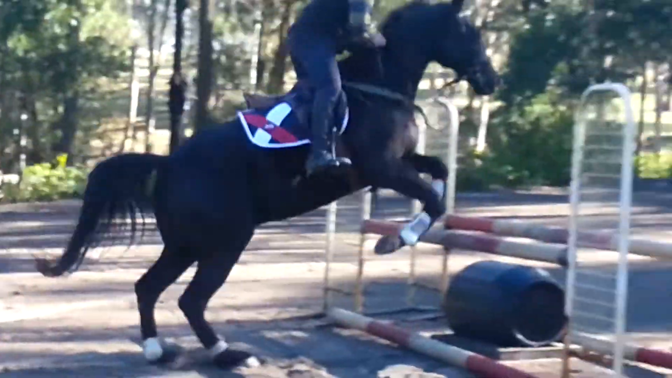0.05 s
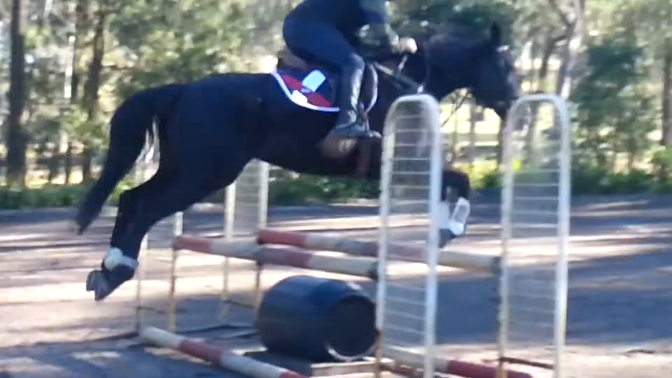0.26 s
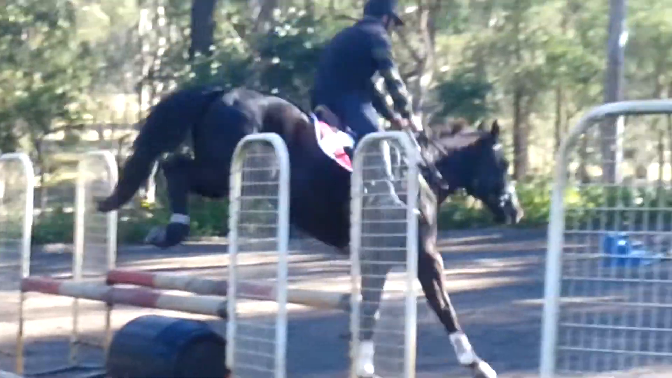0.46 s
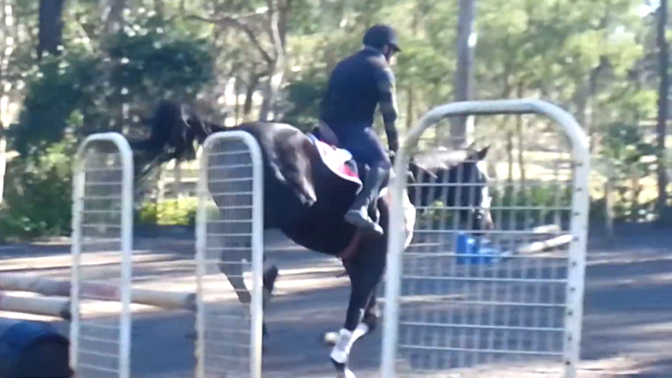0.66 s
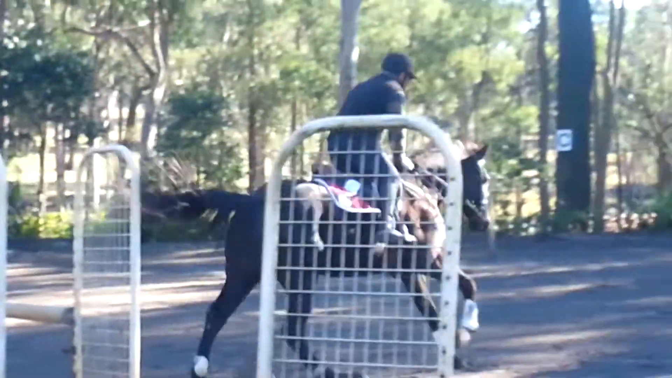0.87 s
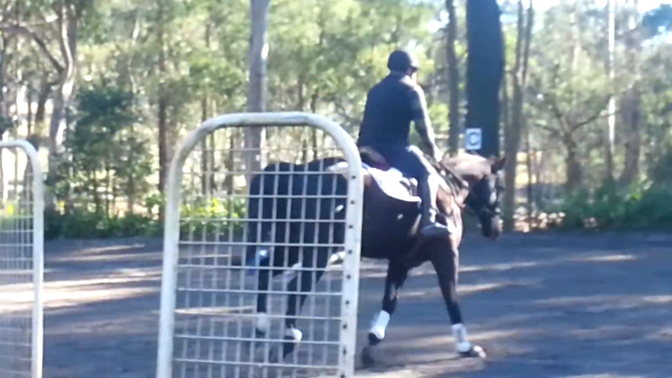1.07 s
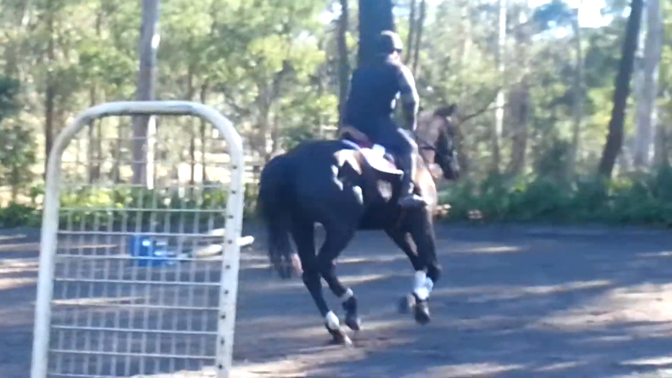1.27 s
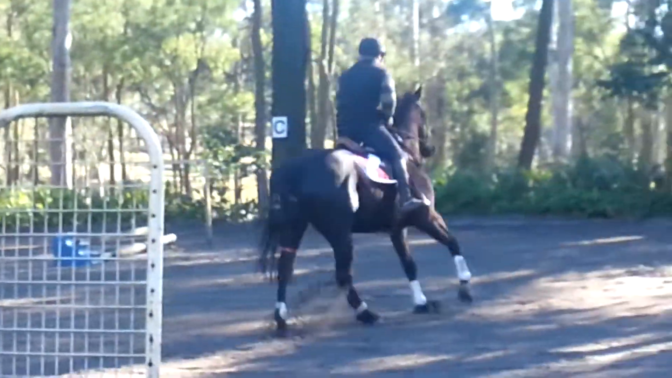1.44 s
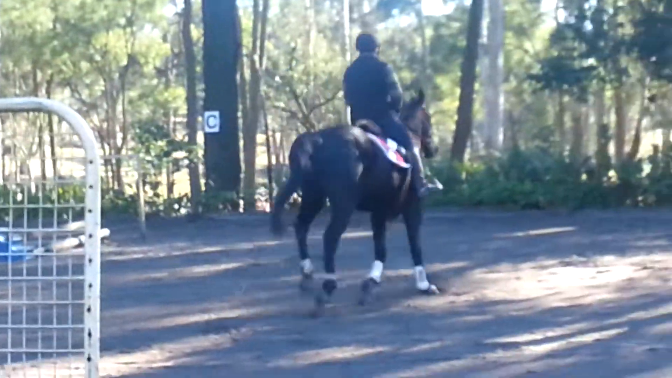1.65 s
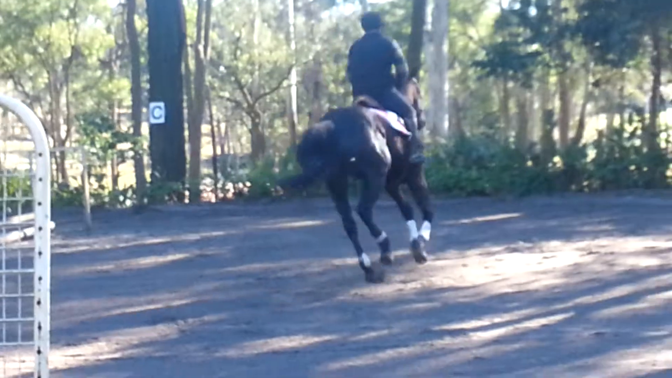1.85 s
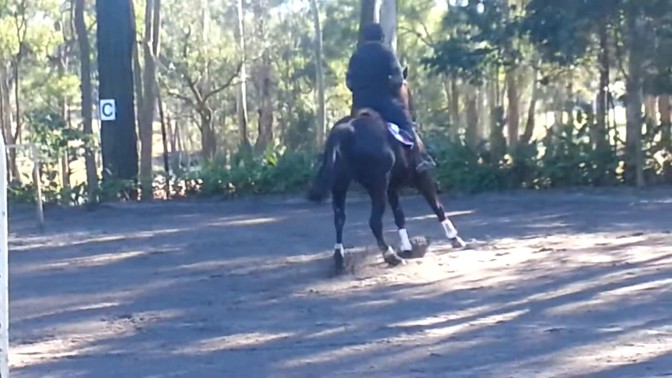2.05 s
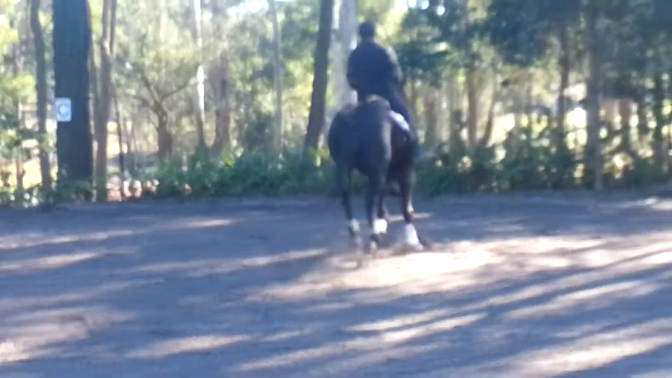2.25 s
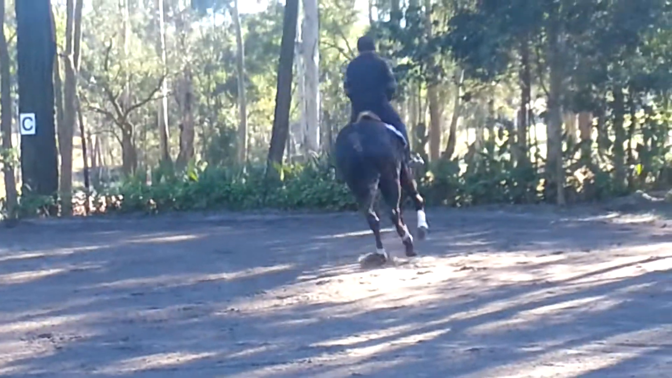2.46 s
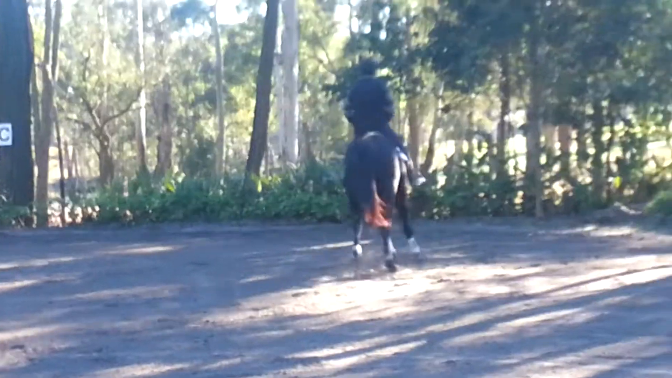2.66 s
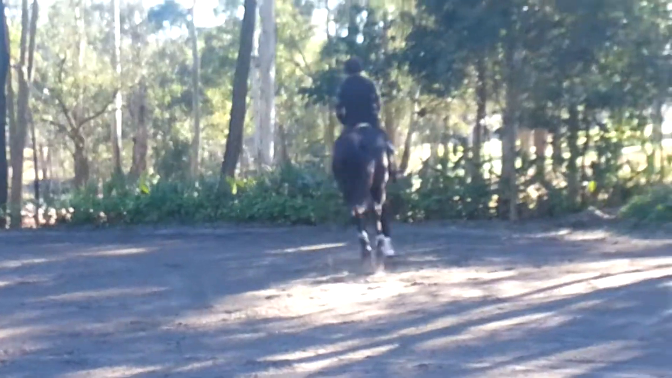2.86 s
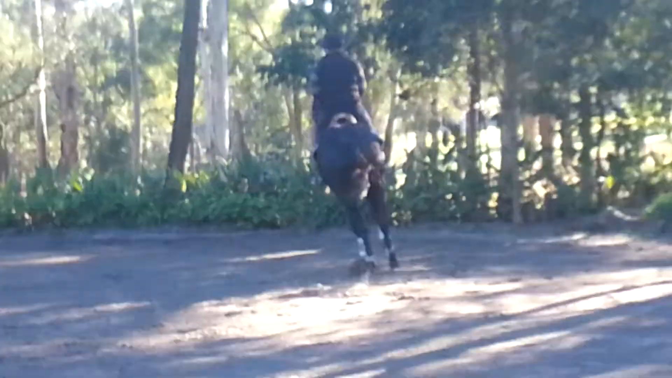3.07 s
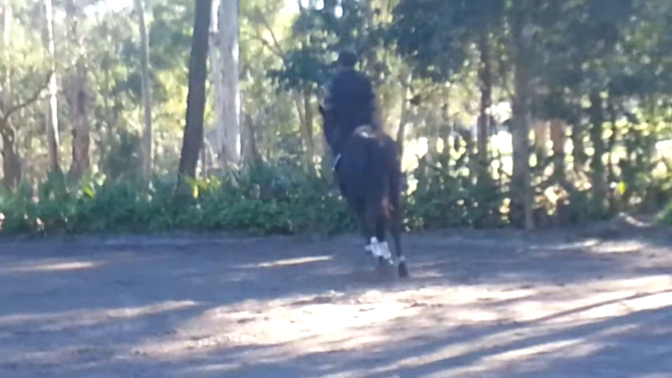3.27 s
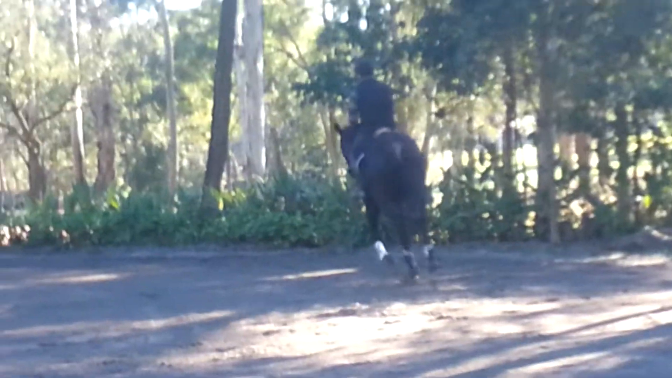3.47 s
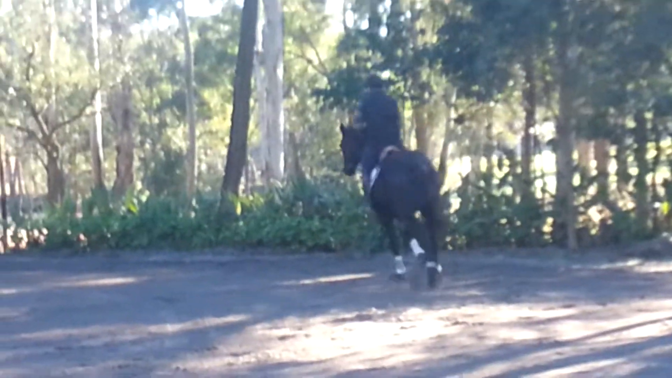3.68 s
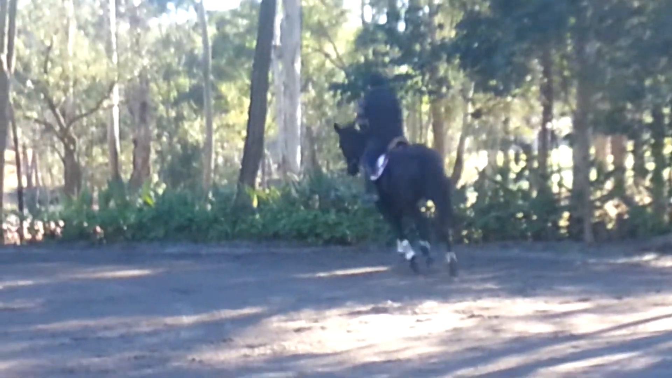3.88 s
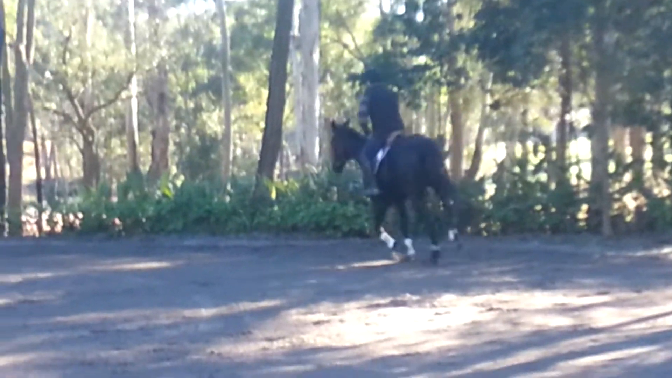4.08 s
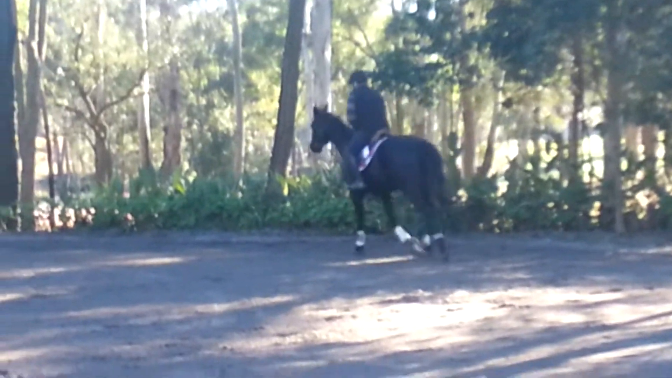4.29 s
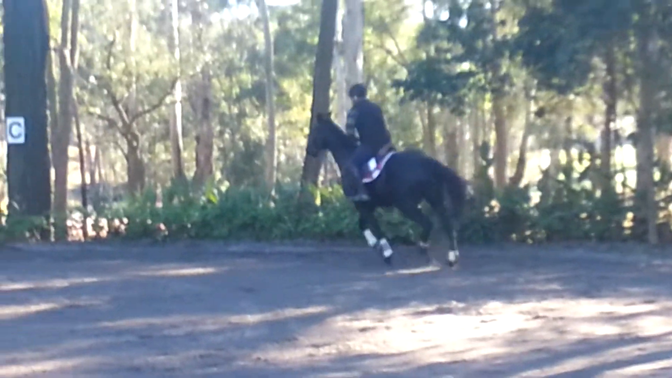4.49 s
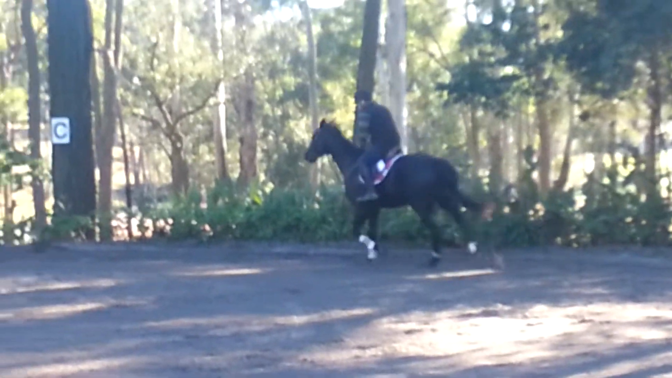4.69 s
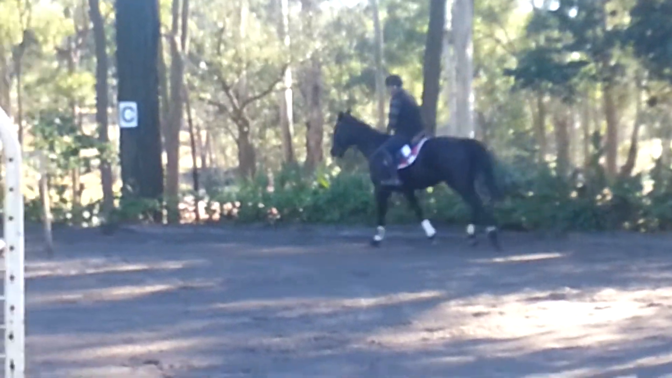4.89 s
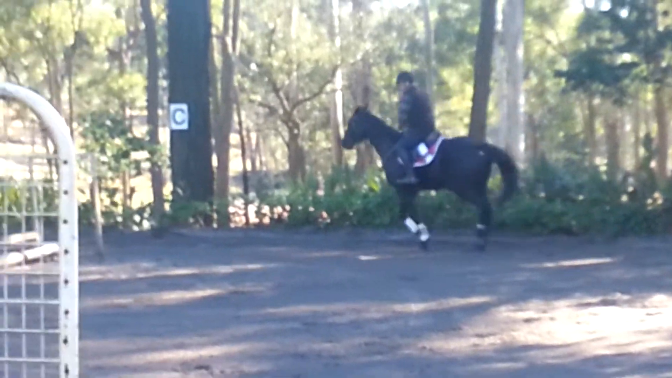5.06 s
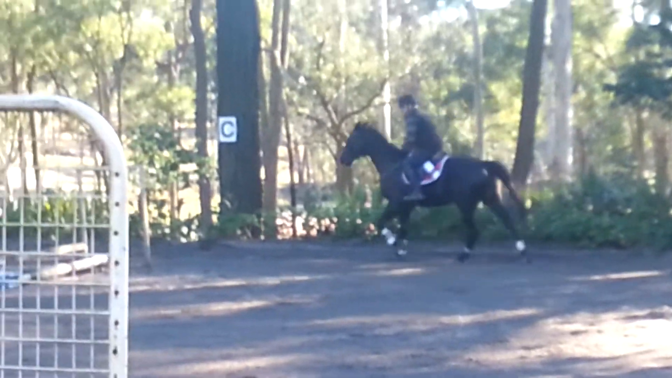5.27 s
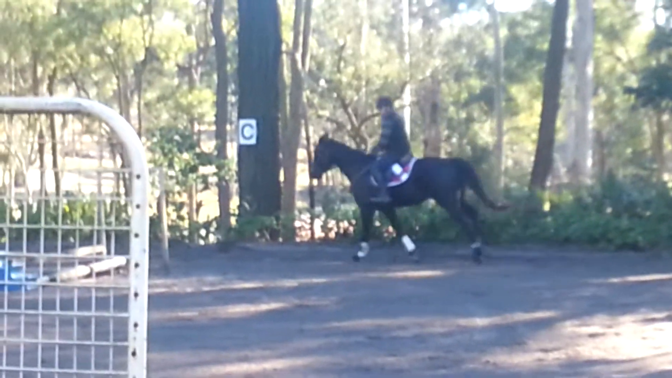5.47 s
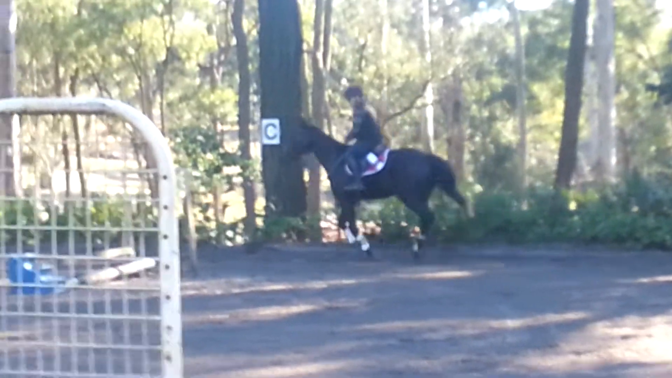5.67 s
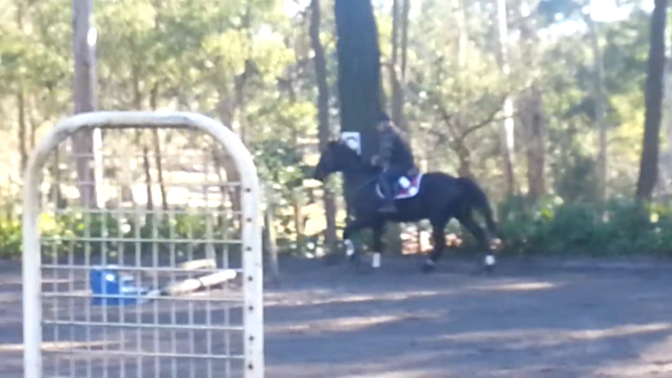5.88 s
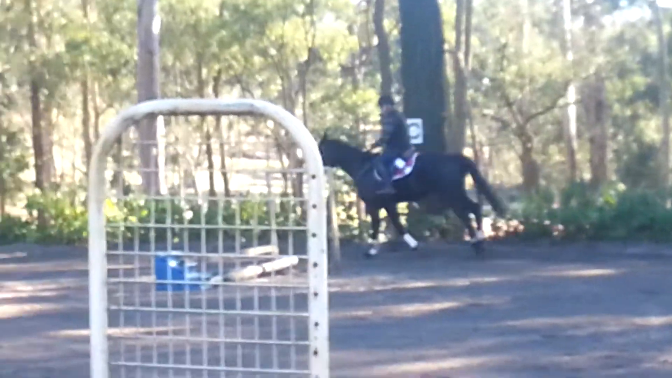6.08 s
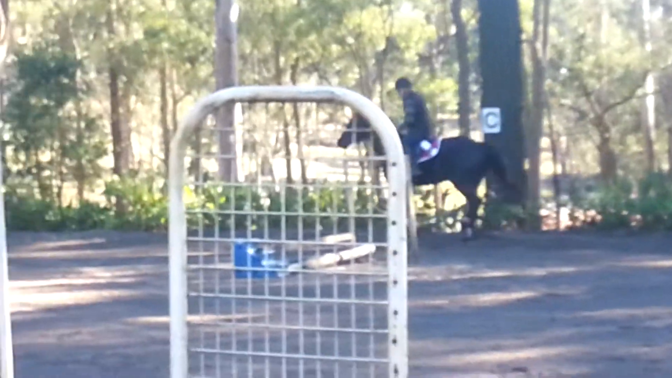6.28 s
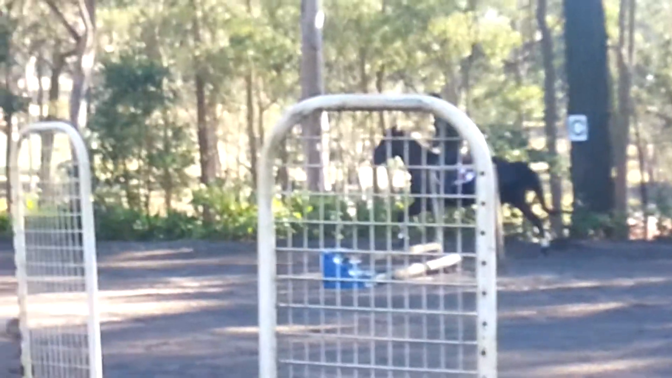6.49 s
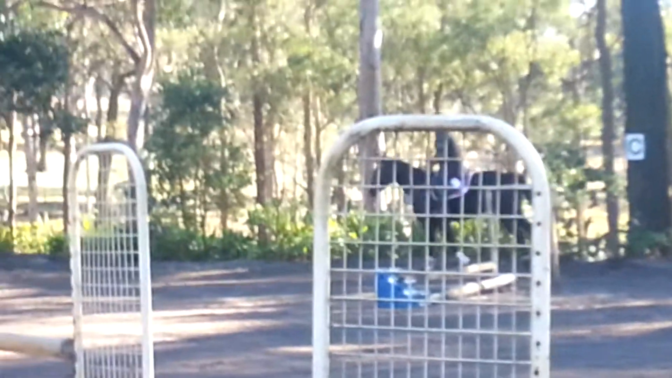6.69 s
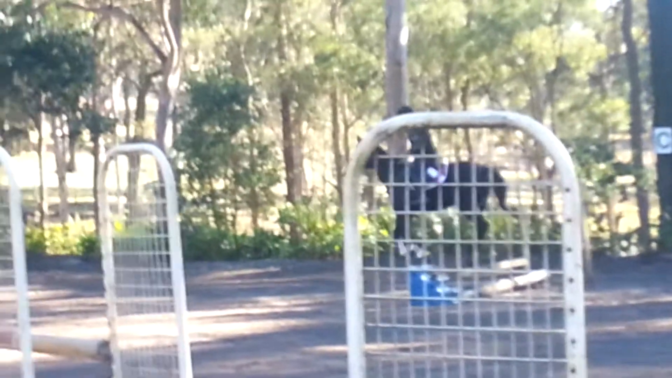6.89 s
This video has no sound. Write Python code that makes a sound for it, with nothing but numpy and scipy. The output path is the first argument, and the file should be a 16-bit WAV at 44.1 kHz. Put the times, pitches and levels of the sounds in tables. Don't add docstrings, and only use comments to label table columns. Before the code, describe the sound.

Outdoors in a wooded sand arena, a horse lands close by with quick dull thumps and a short snort, then knocks a jump pole: a loud wooden clack with bright, ringing metal rattle. Hoofbeats and gritty sand crunch recede while small birds whistle. Late on, a twig snaps close on the right, followed by two fluttering snorts. A handheld microphone picks up low, steady distant traffic and leaf wash.

```python
import sys
import numpy as np
from scipy import signal
from scipy.fft import rfft, irfft, next_fast_len
from scipy.io import wavfile
from scipy.ndimage import uniform_filter1d

SR = 44100
rng = np.random.default_rng(int(sys.argv[2]) if len(sys.argv) > 2 else 0)


def amp(db):
    return 10 ** (np.asarray(db, float) / 20)


def write(x):
    x = np.atleast_2d(x).T
    wavfile.write(sys.argv[1], SR, np.round(np.clip(x, -1, 1) * 32767).astype(np.int16))


N = 306054

# (time [s], peak level [dB], thump pitch [Hz])
HOOF_FALLS = [(0.009, -27, 166.5), (0.073, -24, 188), (0.173, -37.5, 332), (0.538, -36, 317),
              (0.795, -41, 196), (0.854, -38, 337), (0.937, -36, 280), (0.966, -30.5, 249),
              (0.989, -32, 277), (1.111, -32.5, 251), (1.388, -37, 233), (1.539, -38, 164),
              (1.639, -27, 259), (2.868, -39, 410), (3.187, -39, 328), (4.299, -36.5, 271),
              (6.158, -44, 330), (6.197, -45, 300), (6.724, -42, 300), (6.762, -39, 290), (6.8, -38, 225),
              (6.839, -38, 234)]
# (time [s], peak level [dB], pitch [Hz])
CLOPS = [(0.609, -31, 645), (0.814, -35, 820), (0.94, -40, 740), (1.056, -30, 782), (1.113, -37, 563),
         (1.129, -40, 560), (1.314, -37, 680), (1.395, -37, 584), (1.424, -37, 794), (1.514, -40, 670),
         (2.284, -36.5, 700), (3.112, -39.5, 726), (3.388, -38, 640)]
# (time [s], peak level [dB], pitch [Hz], left minus right [dB])
TICKS = [(.3015, -34, 4400, 4), (1.39, -35, 7000, 4), (1.41, -40, 12000, 3), (1.6208, -27, 5000, 8),
         (1.6275, -29.5, 4540, 3), (1.768, -39, 9100, 1.5), (1.717, -30, 3640, 4), (2.1691, -36, 4170, 9),
         (3.1724, -30, 4200, 6), (3.477, -37, 2400, 0), (3.852, -36, 4150, 1.5), (4.076, -33, 2380, 8),
         (5.714, -27, 1700, -22), (5.7354, -27.5, 4250, -14), (5.7708, -21, 2600, -15),
         (5.9288, -39, 5200, 2.5), (6.6877, -43, 4000, 1.5), (6.8478, -52, 4080, 3.5),
         (6.8603, -42, 2350, 3.0)]

# (time [s], level [dB])
BLOWS = [
    (.3290, -2),
    (0.3318, -3),
    (.3345, 1.5),
    (0.3377, -2),
    (.345, -3),
    (.354, -4.5),
    (0.3613, -8),
    (0.386, -15),
    (.505, -23),
    (.54, -21.5),
]
# (frequency [Hz], level [dB], t60 [s])
POLE_MODES = [(194, -1, 0.092), (271, 1.5, 0.094), (348, -9, 0.07), (504, -7.5, 0.088), (800, -14, 0.065),
              (895, -9, 0.07), (1440, -0.5, 0.035), (1700, 0.5, 0.05), (2500, -4, 0.045)]
# (frequency [Hz], level [dB], t60 [s])
STAND_MODES = [(764, -6, 0.33), (1523, -20, 0.84), (2385, -15, 0.41), (2632, -15, 0.73), (2783, -20, 0.59),
               (3628, -23, 0.93), (3919, -7, 0.18), (4124, -12, 0.6), (4301, -3, 0.45), (4441, -9, 0.53),
               (4727, -23, 0.65), (5965, -13, 0.16), (7047, -24, 0.26),
               (4230, -12, 0.6), (4535, -9, .12), (5440, -23, 0.71), (8269, -43, .8), (9012, -32, .6),
             (9464, -29, .4), (10450, -37, .4), (11410, -32, .3), (11700, -35, .8), (11830, -34, .8),
             (12100, -33, .7), (12370, -35, .8), (13030, -31, .35)]
# (frequency [Hz], level [dB], t60 [s], half their gap [Hz], loudest at [s])
TWIN_TUBES = (4194, 6.0, .52, 3.9, .436)
# (frequency [Hz], level [dB per Hz])
RATTLE = [(59, -40), (100, -33), (246, -6), (620, -14), (831, -8), (1190, -16), (1430, -13), (2520, -7.5),
          (2920, -21), (4260, -7.5), (6350, -23.5), (13200, -38), (14200, -60)]
# (frequency [Hz], level [dB per Hz])
SHIMMER = [(59, -56), (100, -23), (383, -7.5), (646, -18.5), (748, -0.5), (904, -10.5), (2050, -13.5),
           (2470, -6), (3320, -17), (4260, -4), (5370, -18), (8400, -32), (11900, -31), (13800, -38),
           (14200, -60)]
POLE_FLOOR_HZ = 175

# (frequency [Hz], level [dB])
RUMBLE = [(60, -30), (130, -10.5), (260, 0.5), (450, -4.5), (800, -25.5)]
# (frequency [Hz], level [dB])
CRUNCH = [(300, -22), (600, -0.5), (900, -1.5), (1600, -5.5), (2600, -5.5), (4200, -9), (7000, -39)]
# (frequency [Hz], level [dB])
SPRAY = [(1200, -22), (2500, 2), (4200, 11.5), (6000, 3), (9000, -2.5), (13000, -4), (16000, -4)]
# (time [s], peak level [dB], body below 2 kHz relative to it [dB])
SCUFFS = [(0.0094, -39.5, 1), (0.07, -46, 9), (0.219, -43, 5), (0.256, -39.5, 7), (0.608, -41.5, 6),
          (0.618, -48, -9), (0.843, -37.5, 0), (0.931, -39, -1), (0.956, -38, 0), (1.05, -49.5, 7),
          (1.119, -40, -1), (1.173, -39, -10), (1.298, -49, 2), (1.349, -46, 8), (1.391, -37.5, 0),
          (1.416, -50, -1), (1.524, -40.5, -12), (1.623, -39, -11), (1.696, -42, -1), (1.765, -40, -20),
          (2.268, -47.5, 2), (2.53, -47, 0), (2.86, -50, 6),(3.188, -45, -4), (3.2494, -49.5, 2.5),
          (3.645, -43.5, -10), (3.669, -53, -2), (3.76, -47, -10), (3.866, -46, -6), (3.668, -46, 5),
          (6.05, -49, -5), (6.115, -47, 3), (6.21, -49, 4), (6.56, -53, -14), (6.862, -55, -8),
          (5.035, -49.5, 2), (5.1, -51, 1)]
# (time [s], level over its far canter [dB])
NEARNESS = [
    (0, 7.5),
    (.28, 6.5),
    (.34, 8.5),
    (.56, 11.5),
    (.7, 8),
    (1.7, 6.5),
    (2.23, 2),
    (3.8, -0.5),
    (6.5, -1.3),
    (6.94, 1.5),
]
# level when far [dB], share of the nearness taken
FAR_DB, FOLLOW = (-57, -58, -67), (0.85, 1.165, 0.71)
SCUFF_S, FLAP_S = 0.036, 0.022

# (time [s], peak level [dB], opening [pitch ratio], brightness [dB per octave])
SNORTS = [(0.244, -26, 0.98, -1), (0.285, -33, 0.94, -4), (6.103, -45, 1, 2), (6.116, -40, 1, 2),
          (6.128, -37, 1.1, -2), (6.141, -46, 1.2, -3), (6.152, -27.5, 0.88, -0.5), (6.164, -33, 0.99, -2),
          (6.187, -34, 1.1, -1), (6.204, -41, 0.85, -2), (6.236, -40, .9, 1), (6.28, -47, 0.93, 1),
          (6.733, -40, 1, 4), (6.742, -29.5, 1.06, -0.5), (6.771, -28, 1.05, -1.5), (6.784, -33, 1.1, -4),
          (6.814, -31, 0.92, -2), (6.865, -36, 1.08, -1), (6.895, -48, 0.9, -2), (6.912, -46, 1.05, 6),
          (6.93, -47, 0.96, 4)]
# (frequency [Hz], width [Hz], level [dB])
NOSE = [(300, 470, -5), (915, 380, -1), (1484, 350, 2.5), (2200, 270, -3), (3000, 540, -7),
        (4100, 660, -5.5), (4840, 380, -10)]
# (time [s], peak level [dB],
# pitch [Hz])
POPS = [(.248, -32, 1630), (.251, -32, 800), (.285, -35, 1500), (0.291, -36, 1830), (.288, -40.5, 3100),
        (.484, -35, 3700), (.3015, -40, 4400), (6.068, -52, 2400), (6.106, -49, 2200), (6.121, -45, 2090),
        (6.131, -42, 1650), (6.131, -50, 4450), (6.155, -43.5, 4900), (6.155, -38, 1200),
        (6.154, -42, 2200), (6.165, -45, 1600), (6.192, -40, 990), (6.192, -51, 4670), (6.205, -44, 800),
        (6.283, -53, 4530), (6.694, -52, 4000), (6.735, -45, 2200), (6.742, -41.5, 2200),
        (6.743, -44, 4220), (6.747, -44, 3700), (6.745, -41, 1100), (6.776, -40, 2370), (6.778, -46, 3000),
        (6.776, -39, 840), (6.785, -39, 1550), (6.815, -40, 1300), (6.822, -39, 1400), (6.817, -49, 4200),
        (6.850, -49, 4000), (6.862, -48, 4150), (6.871, -48, 1550), (6.897, -51, 2100), (6.917, -55, 6640),
        (6.925, -56, 6700), (6.914, -50, 4300), (6.924, -50, 4700), (6.935, -52, 4800)]
# (time [s], peak level [dB], pitch [Hz], left minus right [dB])
CLICKS = [(3.1733, -29.5, 5600, 5), (3.1738, -34, 11000, 0), (3.1748, -38, 1800, 3),
          (5.7045, -44, 9000, -12), (5.7357, -40, 13000, -12), (5.7712, -28, 4500, -15),
          (5.7712, -43, 13000, -10), (6.0565, -44, 10500, 0), (6.0645, -45, 11000, 0),
          (.3348, -18, 12100, -4), (.3462, -30, 12500, 0)]
POP_S, CLICK_TURNS = 0.0024, 0.8
# (time [s], peak level [dB], swing [Hz], left minus right [dB])
SNAP = (5.7069, -18.5, 246, -19)

# (start [s], length [s], from [Hz], to [Hz], level [dB])
RIGHT_BIRD = [
    (1.755, 0.028, 3050, 3480, -53),
    (1.782, 0.05, 3500, 3810, -43.5),
    (1.83, 0.036, 3800, 4180, -43.5),
    (1.911, 0.11, 4290, 4080, -43.5),
    (2.07, .075, 4170, 4140, -60),
    (2.228, 0.045, 3350, 3770, -57),
    (2.28, .035, 4000, 4500, -61),
    (2.38, .035, 3800, 4120, -55),
    (2.42, 0.053, 4180, 3780, -55.5),
]
# (start [s], length [s], from [Hz], to [Hz], level [dB])
LEFT_BIRD = [(4.465, .065, 4500, 5700, -58.5), (5.205, .02, 4420, 4590, -53.5),
             (5.236, 0.014, 4560, 4500, -52), (5.31, 0.072, 3460, 5530, -49),
             (5.442, 0.011, 4620, 4500, -47), (5.456, 0.012, 4560, 4400, -43.5),
             (5.47, .022, 4370, 4050, -58), (5.503, 0.018, 4200, 4400, -54),
             (5.524, 0.016, 4410, 4420, -47), (5.546, 0.011, 4415, 4430, -48),
             (5.618, 0.02, 4350, 4950, -53), (5.636, .009, 5000, 5500, -57), (5.675, .012, 4400, 4400, -60),
             (5.69, 0.013, 4880, 4820, -56)]
# (start [s], length [s], from [Hz], to [Hz], level [dB])
FAR_BIRDS = [(.645, .03, 4500, 4570, -48), (.674, .014, 4100, 3330, -51), (.69, 0.028, 3260, 2700, -50.5),
             (.98, 0.063, 3840, 4190, -50.5), (1.16, 0.02, 4690, 4600, -54), (1.1, 0.072, 4150, 4230, -55),
             (1.195, 0.059, 4100, 3400, -58), (1.2, 0.012, 2960, 2880, -50.5),
             (1.217, 0.016, 2900, 2590, -52), (2.567, 0.019, 4330, 4600, -55),
             (2.675, .025, 2800, 2680, -63), (2.708, .072, 2610, 2150, -59.5),
             (2.68, 0.095, 5550, 4540, -62.5), (3.903, 0.038, 2660, 2600, -58.5),
             (4.828, .01, 5450, 5450, -57), (5.045, .01, 5150, 5050, -57), (5.045, .035, 2120, 2260, -59),
             (5.608, .012, 2250, 2350, -55), (4.18, .04, 2640, 2650, -65), (5.44, 0.066, 2140, 2200, -60),
             (5.53, 0.094, 2450, 2400, -61.5), (5.808, .01, 5600, 5450, -68),
             (5.826, .022, 5150, 4920, -59), (5.73, .012, 5350, 5350, -54)]
# (start [s], length [s], level [dB])
PIPER = [(2.19, 0.061, -60), (2.359, 0.046, -61), (4.125, 0.052, -57.5), (4.272, .03, -62),
         (6.348, 0.018, -53.5), (6.38, 0.014, -55), (6.424, 0.04, -62), (6.52, 0.026, -55.5),
         (6.61, .012, -60), (6.655, .026, -60)]
PIPE_HZ, RIGHT_PAN_DB, LEFT_PAN_DB = 3310, -8.5, 2.5
RISER, SWELL_DB, FADE_DB = 1.1, -12, -5.5
WAVER = 0.0039

# (start [s], length [s], knee [Hz], level [dB], left minus right [dB])
SWOOPS = [
    (3.732, .037, 4135, -42.5, 8),
    (4.266, .047, 4055, -40, 7),
]
# (share of length, pitch ratio, level [dB])
SWOOP_SHAPE = [(0, 1.17, -8), (.2, 1.085, -5.5), (.52, 1.05, -4), (.71, .975, 2.5), (.88, .79, 1),
               (.94, 0.69, -21), (1, .58, -6)]
# (start [s], length [s], top [Hz], level [dB], skew: under 1 the top is early)
HOOKS = [
    (3.79, 0.038, 2636, -48, 1),
    (4.336, 0.035, 2750, -46, .68),
    (4.859, 0.037, 2350, -47.5, .85),
]
HOOK_BASE_HZ, HOOK_ENDS_DB, HOOK_PAN_DB = 1910, -4.5, -1.5
# (time [s], pitch [Hz], level [dB])
BROKEN_CALL = [(4.784, 3920, -48), (4.791, 3790, -47), (4.797, 3410, -42), (4.802, 3040, -54),
               (4.81, 2945, -50), (4.816, 3410, -39.5), (4.823, 3410, -40), (4.827, 3140, -50),
               (4.831, 2000, -49)]
BROKEN_PAN_DB = 1.5
DEEP_LAG = 18

# (frequency [Hz], t60 [s])
TREES = [(200, 0.094), (1500, 0.49), (4000, 0.64), (9000, 0.31)]
# (frequency [Hz], level [dB per Hz])
AIR = [(15, -27), (33, -15), (65, -3), (173, -0.5), (322, -3), (368, -1.5), (495, -5.5), (742, -3.5),
       (1240, -14.5), (1580, -17), (2300, -17), (2770, -21.5), (4620, -20), (6560, -28), (13900, -25.5),
       (15500, -54)]
AIR_DB = -50
# (frequency [Hz], left-right likeness)
SAME = [(60, 0.96), (150, 0.9), (380, 0.63), (950, 0.084), (2380, -0.081), (5980, -0.019), (15000, -0.18)]
# (frequency [Hz], left minus right [dB])
LEAN = [(60, 1.5), (150, -0.5), (380, 0.5), (950, -1.5), (2380, 1), (5980, 3.5), (15000, -4)]
BASS_CUT_HZ, EDGE_HZ = 53, 14500


def evened(x):
    return x / np.sqrt(np.mean(x ** 2) + 1e-20)


def read(points, hz):
    f, value = np.transpose(points)
    return np.interp(np.log(hz + 1), np.log(f + 1), value)


def add(mix, s, sound, pan_db=0):
    part = mix[:, round(s * SR):][:, :sound.shape[-1]]
    sides = amp(np.array([[pan_db / 2], [-pan_db / 2]]))
    part += (sound * sides)[:, :part.shape[1]]


def ring(hz, t60, rise=.001):
    t = np.arange(0, 1.2 * t60, 1 / SR)
    return amp(-60 * t / t60) * (1 - np.exp(-t / rise)) * np.sin(2 * np.pi * hz * t)


def blip(hz, width):
    t = np.arange(-3 * width, 3 * width, 1 / SR)
    return np.exp(-(t / width) ** 2) * np.sin(2 * np.pi * hz * t)


def burst(s, length):
    u = np.arange(0, 8, 1 / (length * SR / 4))
    return round(s * SR), u * np.exp(1 - u)


def noise(spectrum, likeness, patchy_db, size=512, count=N):
    frames, hz = 2 * count // size + 5, np.fft.rfftfreq(size, 1 / SR)
    a, b, c, d, patches = rng.standard_normal((frames, len(hz), 5)).T
    patches = evened(uniform_filter1d(uniform_filter1d(patches, size=8, axis=0), size=6, axis=1))
    same = np.clip(read(SAME, hz) + likeness, -1, 1)[:, None]
    left = a + 1j * b
    right = same * left + np.sqrt(1 - same ** 2) * (c + 1j * d)
    z = np.array([left, right]) * amp(read(spectrum, hz)[:, None] + patchy_db * patches)
    sound = signal.istft(z, window="cosine", nperseg=size, noverlap=size // 2)[1]
    return evened(sound[:, :count])


def lumps(length, depth_db):
    size = max(round(length * SR), 1)
    drift = uniform_filter1d(uniform_filter1d(rng.standard_normal(N), size), size)
    return evened(amp(depth_db * evened(drift)))


def hooves():
    out, t = np.zeros((2, N)), np.arange(400) / SR
    for s, db, hz in HOOF_FALLS:
        thump = ring(hz, .05, 0.0033) + 0.35 * ring(1.6 * hz, .05, 0.0028)
        add(out, s, amp(db + 3.0) * thump)
    for s, db, hz in CLOPS:
        clop = ring(hz, .025, 0.00092)
        clop = clop + 0.5 * ring(0.637 * hz, .025, 0.0018) + 0.28 * ring(2.3 * hz, .025, 0.0014)
        add(out, s, amp(db + 3.5) * clop)
    for (s, db, hz, pan_db), grit in zip(TICKS, rng.standard_normal((len(TICKS), 400))):
        edge = signal.iirpeak(hz, .7, SR)
        fizz = signal.lfilter(*edge, signal.lfilter(*edge, grit))
        swell = amp(db + 12.5 - 60 * t / 0.0034) * (1 - np.exp(-(t / 0.00082) ** 2))
        add(out, s, swell * (fizz + 0.5 * np.sin(2 * np.pi * hz * t)), pan_db)
    return out


def mesh(count=440):
    place, spread, life, *turn = rng.random((count, 5)).astype(np.float32).T[:, :, None]
    hz, t = 250 * 58 ** place, np.arange(SR // 2, dtype=np.float32) / SR
    size = np.sqrt(hz) * amp(read(SHIMMER, hz) + 7.1 * spread) * amp(-60 * t / (0.37 + 0.46 * life))
    apart = np.minimum(hz / 5000, 1) * (turn[1] - .5)
    left = size * np.sin(2 * np.pi * (hz * t + turn[0]))
    right = size * np.sin(2 * np.pi * (hz * t + turn[0] + apart))
    return evened(np.array([left.sum(0), right.sum(0)])) * (1 - np.exp(-t / .005))


def rap():
    out, age = np.zeros((2, N)), np.arange(SR) / SR
    first, hardest = BLOWS[0][0], BLOWS[2][0]
    rocking = lumps(.014, 3.0)
    clatter = noise(RATTLE, 0.48, 2.2, size=256, count=SR)
    for s, blow_db in BLOWS:
        for (hz, db, t60), sign in zip(POLE_MODES, rng.choice([-1, 1], len(POLE_MODES))):
            add(out, s, sign * amp(-20.5 + blow_db + db) * ring(hz, t60, 0.00046))
    for s, blow_db in BLOWS[2:7]:
        add(out, s, amp(-9.0 + blow_db) * ring(1780, 0.0051, 0.00018))
    crack_band = signal.butter(2, [3000, 10500], "band", fs=SR)
    crack = signal.lfilter(*crack_band, rng.standard_normal((2, 300))) * amp(-60 * age[:300] / 0.011)
    add(out, hardest, amp(-9.5) * crack, 3)
    for hz, db, t60 in STAND_MODES:
        mode = ring(hz, t60, 0.014)
        shake = np.roll(rocking, round(hz))[:len(mode)]
        add(out, hardest, amp(-22.0 + db) * mode * shake, 2.5)
    hz, db, t60, beat, loudest = TWIN_TUBES
    mode = ring(hz, t60, 0.0045)
    mode = mode * rocking[:len(mode)] ** .2
    beating = np.tanh(1.7 * np.cos(2 * np.pi * beat * (hardest + age[:len(mode)] - loudest)))
    add(out, hardest, amp(-23.0 + db) * mode * beating, 2.5)
    settled = 1 / (1 + np.exp(np.minimum((age - .036) / 0.0024, 50)))
    rattling = amp(-14.5 - 60 * age / 0.23) * (1 - np.exp(-(age / 0.0028) ** 2)) * settled
    add(out, first, rattling * clatter)
    add(out, first, amp(-35.0) * mesh())
    buzz = noise(SHIMMER, 0.33, 4.8, size=256, count=SR)
    add(out, hardest, amp(-24.5 - 60 * age / 0.62) * buzz)
    return signal.sosfilt(signal.butter(10, POLE_FLOOR_HZ, "high", fs=SR, output="sos"), out)


def snorts():
    out = np.zeros((2, N))
    swell = burst(0, FLAP_S)[1]
    for (s, peak_db, opening, tilt_db), air in zip(SNORTS, rng.standard_normal((len(SNORTS), 4096))):
        nose = 0
        for hz, width, db in NOSE:
            passage = signal.iirpeak(hz * opening, hz / width, SR)
            breath = evened(signal.lfilter(*passage, signal.lfilter(*passage, air)))
            nose = nose + amp(db + tilt_db * np.log2(hz / 1400)) * breath
        add(out, s - .003, amp(peak_db - 11.0) * swell * evened(nose)[-len(swell):])
    return out * lumps(0.0022, 2.1)


def pops():
    out = np.zeros((2, N))
    for s, db, hz in POPS:
        add(out, s - 3 * POP_S, amp(db + 1.5 - 1.2 * np.log2(hz / 1000)) * blip(hz, POP_S), .3)
    for s, db, hz, pan_db in CLICKS:
        width = CLICK_TURNS / hz
        add(out, s - 3 * width, amp(db) * blip(hz, width), pan_db)
    return out


def footing():
    near_db = np.interp(np.arange(N) / SR, *np.transpose(NEARNESS))
    rumble, crunch, spray = (amp(db + share * near_db) for db, share in zip(FAR_DB, FOLLOW))
    for s, db, body_db in SCUFFS:
        at, swell = burst(s, SCUFF_S)
        spray[at:at + len(swell)] += amp(db - 12.5) * swell
        crunch[at:at + len(swell)] += amp(db + body_db - 8.5) * swell
    return (rumble * lumps(0.025, 2.6) * noise(RUMBLE, 0.16, 1.6, size=1024)
            + crunch * lumps(0.0056, 2.0) * noise(CRUNCH, 0.2, 2.4)
            + amp(2.5) * spray * lumps(0.0021, 2.0) * noise(SPRAY, 0.2, 3.2, size=256))


def snap():
    s, db, hz, pan_db = SNAP
    out, t = np.zeros((2, N)), np.arange(-60, 500) / SR
    swing = -.75 * np.exp(-t / 0.0013) * np.cos(2 * np.pi * hz * t)
    push = uniform_filter1d(np.where(t < 0, np.exp(t / 0.00015), swing), size=7)
    splinters = 0.037 * rng.standard_normal(len(t)) * np.exp(-((t - .004) / 0.0044) ** 4)
    add(out, s + t[0], amp(db) * (push + splinters), pan_db)
    return out


def birds(whistles, flutter_db, edge):
    out = np.zeros((2, N))
    waver = 1 + WAVER * evened(uniform_filter1d(rng.standard_normal(N), size=120))
    for rows, pan_db in whistles:
        s, hz, db = np.transpose(rows)
        t = np.arange(s[0] - 0.55 * edge, s[-1] + .55 * edge, 1 / SR)
        pitch = uniform_filter1d(np.interp(t, s, hz), size=90, mode="nearest")
        pitch = pitch * waver[round(s[0] * SR):][:len(t)]
        tone = np.sqrt(2) * np.sin(2 * np.pi * np.cumsum(pitch) / SR)
        fade = np.minimum(np.minimum(t - t[0], t[-1] - t) / edge, 1)
        add(out, t[0], amp(np.interp(t, s, db)) * tone * fade, pan_db)
    return out * lumps(0.0049, flutter_db)


def glides(notes, pan_db):
    u, whistles = np.linspace(0, 1, num=9), []
    for s, length, from_hz, to_hz, db in notes:
        shape_db = SWELL_DB * (1 - u) ** 3 if to_hz > RISER * from_hz else FADE_DB * u ** 2
        whistles.append((np.c_[s + length * u, from_hz + (to_hz - from_hz) * u, db + shape_db], pan_db))
    return whistles


def chorus():
    pipes = [(s, length, PIPE_HZ, PIPE_HZ, db) for s, length, db in PIPER]
    sides = glides(RIGHT_BIRD, RIGHT_PAN_DB) + glides(LEFT_BIRD, LEFT_PAN_DB)
    return birds(sides + glides(FAR_BIRDS + pipes, 0), 3.0, .0066)


def chirper():
    share, ratio, shape_db = np.transpose(SWOOP_SHAPE)
    calls = [(np.c_[s + length * share, hz * ratio, db + shape_db], pan_db)
             for s, length, hz, db, pan_db in SWOOPS]
    u = np.linspace(0, 1, num=12)
    for s, length, hz, db, skew in HOOKS:
        arch = np.sin(np.pi * u ** skew)
        pitch = HOOK_BASE_HZ + (hz - HOOK_BASE_HZ) * arch
        calls.append((np.c_[s + length * u, pitch, db + HOOK_ENDS_DB * (1 - arch)], HOOK_PAN_DB))
    left, right = birds(calls, 2.4, .003)
    lagged = np.array([np.roll(left, DEEP_LAG // 2), np.roll(right, -DEEP_LAG // 2)])
    return lagged + birds([(BROKEN_CALL, BROKEN_PAN_DB)], 1.2, .003)


def trees(x, nearest, reach):
    length = SR // 2
    taps, slots = np.zeros((2, length)), np.arange(400, length - 20, 20)
    at = slots + rng.integers(0, 20, (2, len(slots)))
    np.put_along_axis(taps, at, rng.choice([-1., 1.], at.shape), 1)
    closeness = 1 + nearest * np.exp(-np.arange(length) / SR / 0.016)
    taps *= lumps(0.0088, 1.1)[:length] * closeness
    hz, t, z = signal.stft(taps, SR, nperseg=256)
    decay = amp(-60 * t / (reach * read(TREES, hz)[:, None]))
    tail = signal.istft(z * decay, SR, nperseg=256)[1]
    return signal.fftconvolve(x, tail / np.linalg.norm(tail[0]), axes=1)[:, :N]


def wash():
    return amp(AIR_DB) * noise(AIR, 0, 1.33, size=1024)


def scene():
    horse = hooves() + snorts() + pops() + rap()
    song, deep = chorus(), chirper()
    echoes = trees(amp(-13.5) * horse + amp(-6.5) * song, 1.5, 1.1) + trees(amp(-5.5) * deep, 1.5, 1.4)
    return horse + song + deep + snap() + echoes + footing() + wash()


def band_limit(x):
    return signal.sosfilt(signal.butter(12, 15660, fs=SR, output="sos"), x)


def record(dry):
    size = next_fast_len(N)
    hz = np.fft.rfftfreq(size, 1 / SR)
    lean_db = read(LEAN, hz)
    bass_cut = hz ** 2 / (hz ** 2 + BASS_CUT_HZ ** 2)
    band_edge = amp(-30) + 1 / (1 + np.exp((hz - EDGE_HZ) / 90))
    colour = amp(1.1) * bass_cut * band_edge * amp(np.array([lean_db / 2, -lean_db / 2]))
    ports = irfft(rfft(dry, size) * colour, size)[:, :N]
    return band_limit(ports)


dry = scene()
out = record(dry)
write(out)
```